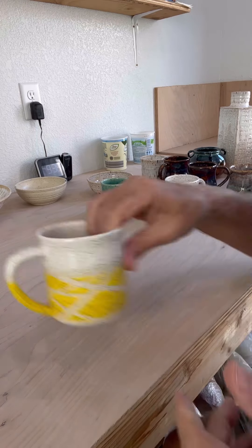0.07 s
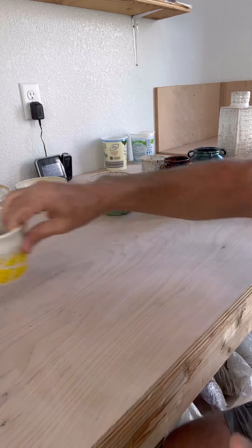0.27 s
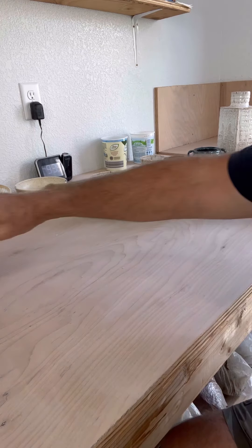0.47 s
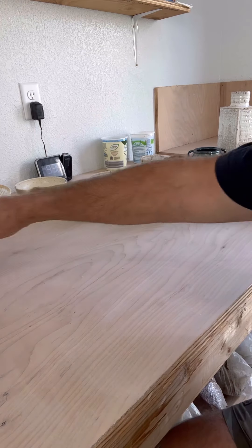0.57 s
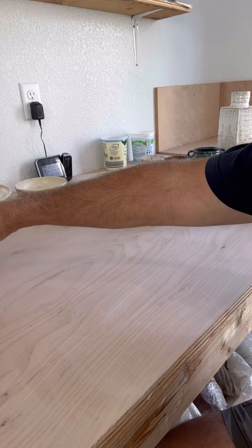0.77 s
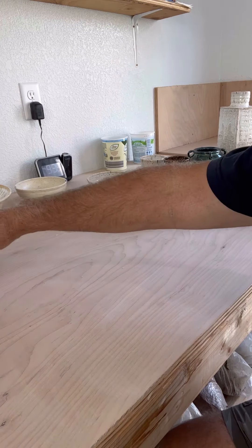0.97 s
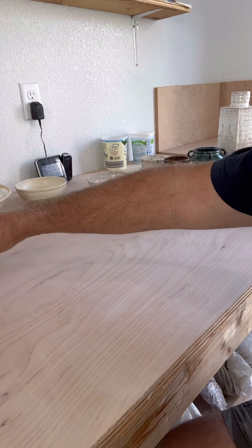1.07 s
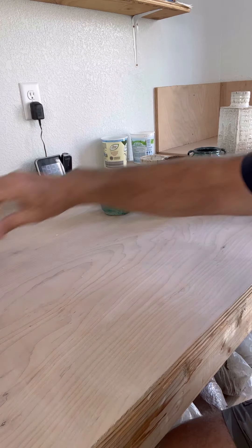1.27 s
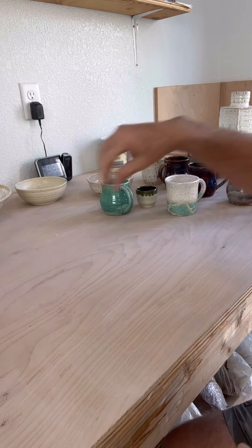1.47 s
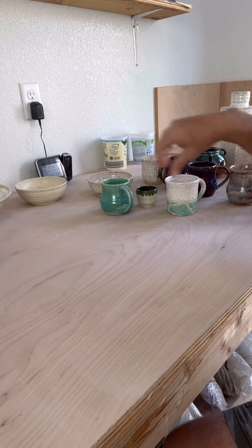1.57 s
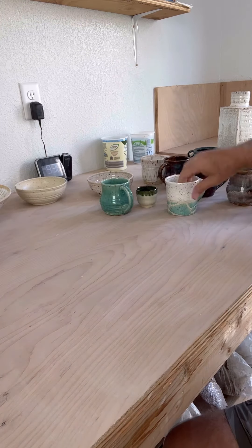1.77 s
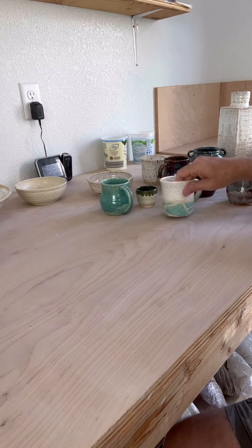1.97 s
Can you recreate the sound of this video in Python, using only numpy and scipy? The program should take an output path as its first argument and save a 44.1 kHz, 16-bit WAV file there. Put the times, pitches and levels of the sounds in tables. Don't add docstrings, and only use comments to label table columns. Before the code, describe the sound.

One solid woody clunk of a glazed mug set on a bench, with short room reverberation

```python
import sys
import numpy as np
from scipy import signal
from scipy.fft import rfft, irfft
from scipy.io import wavfile
from scipy.ndimage import uniform_filter1d

SR = 44100
rng = np.random.default_rng(int(sys.argv[2]) if len(sys.argv) > 2 else 0)


def magnitude_from_level(level_db):
    exponent = np.asarray(level_db, float) / 20
    return 10 ** exponent


def to_wav(s):
    ch = np.atleast_2d(s).T
    pcm = np.round(np.clip(ch, -1, 1) * 32767)
    wavfile.write(sys.argv[1], SR, pcm.astype(np.int16))


N = 89170

# start in seconds, level in dB, contact low-pass in Hz.
TOUCHES = [
    (0.9495, -7, 2004),
    (0.9534, -8, 1500),
    (0.9658, -11, 1200),
]


def rms_one(x):
    return x / np.sqrt(np.mean(x ** 2) + 1e-20)


def at_hz(points, hz):
    p = np.array(points)
    return np.interp(np.log(np.maximum(hz, 1)), np.log(p[:, 0]), p[:, 1])


def decay_per_sample(t60):
    return magnitude_from_level(-60 / (t60 * SR))


def coloured(spectrum, channels):
    hz = np.arange(N // 2 + 1) * SR / N
    white = rfft(rng.standard_normal((channels, N)))
    return rms_one(irfft(white * magnitude_from_level(at_hz(spectrum, hz)), N))


def diffuse(pair):
    # frequency in Hz, left-right likeness as a share.
    likeness = [(60, 0.99), (200, 0.99), (320, 0.88), (520, 0.66), (900, 0.017), (1500, 0.33),
                (2600, -0.45)]
    alike = np.clip(at_hz(likeness, np.arange(N // 2 + 1) * SR / N), -1, 1)
    mid, side = rfft(pair)
    spread = np.sqrt(1 - alike) * side * [[1], [-1]]
    return irfft(np.sqrt(1 + alike) * mid + spread, N) / np.sqrt(2)


def background():
    # frequency in Hz, level in dB per Hz.
    air_colour = [(40, -10.5), (58, -1.5), (140, -9), (250, -0.15), (420, -11), (750, -9.5), (1210, -18),
                  (2600, -26.5), (3600, -50)]
    common_colour = [(2500, -15), (3200, -2), (5000, -9.5), (7500, -15), (10500, -19), (15000, -22)]
    opposed_colour = [(2500, -26), (3200, -2.5), (5000, -18.5), (7500, -17.5), (10000, -16), (15000, -10.5)]
    air = magnitude_from_level(-52.5) * diffuse(coloured(air_colour, channels=2))
    common = magnitude_from_level(-82) * coloured(common_colour, channels=1)
    opposed = magnitude_from_level(-77.5) * coloured(opposed_colour, channels=1) * [[1], [-1]]
    return air + common + opposed


def friction(s, half, db, hz, width):
    sos = signal.butter(2, [hz - width / 2, hz + width / 2], "band", fs=SR, output="sos")
    common, opposed = rms_one(signal.sosfilt(sos, rng.standard_normal((2, N))))
    swell = np.exp(-((np.arange(N) / SR - s) / half) ** 2)
    spread = min(hz / 3000, 0.5)
    return magnitude_from_level(db) * swell * (common + spread * opposed * np.array([[1], [-1]]))


def rustles():
    # centre in seconds, half length in seconds, level in dB, frequency in Hz, width in Hz.
    rubs = [
        (.132, .014, -76, 4300, 1300),
        (.83, .05, -85, 4400, 700),
        (.33, .05, -83, 3800, 1200),
        (.29, .02, -88, 13000, 3000),
        (.49, .03, -88, 13000, 4000),
        (1.5, .1, -82, 6000, 3000),
        (1.6, .11, -75, 4000, 1600),
        (1.785, .03, -81, 14300, 2600),
        (1.86, .06, -80, 4300, 2000),
        (1.75, .15, -72, 2200, 1000),
    ]
    return sum(friction(*row) for row in rubs)


def squeaks():
    # centre in seconds, half length in seconds, level in dB, frequency in Hz.
    slips = [
        (0.285, 0.0097, -76, 4150),
        (0.282, 0.017, -78, 3470),
        (0.287, .015, -78.5, 7050),
        (.285, .015, -73.5, 10000),
        (0.339, .012, -76, 4100),
        (0.798, 0.023, -79, 4180),
        (0.833, 0.043, -82, 4640),
        (.92, .015, -83, 4580),
        (1.09, .025, -77, 6410),
    ]
    return sum(friction(*row, width=100) for row in slips)


def contacts(rows):
    force = np.zeros(N)
    for s, db, hz in rows:
        offset = np.arange(N) - s * SR
        click = magnitude_from_level(db) * np.sinc(offset) * (abs(offset) < 16)
        force += signal.sosfilt(signal.butter(2, hz, fs=SR, output="sos"), click + 1e-18)
    return force


def hard_touches():
    clicks = np.zeros(N)
    for s, db, _ in TOUCHES:
        clicks[int((s + 0.0002) * SR)] = magnitude_from_level(db)
    return clicks


def grit(clicks):
    # frequency in Hz, level in dB per Hz.
    grit_colour = [(600, -1.5), (1300, 13), (2200, -3), (3000, -17.5), (4500, -21.5), (7000, -35.5),
                   (11000, -38.5), (15500, -48)]
    fall_t60_s, rise_t60_s = 0.056, 0.002
    fade = signal.lfilter([1], [1, -decay_per_sample(fall_t60_s)], clicks + 1e-18)
    fade -= signal.lfilter([1], [1, -decay_per_sample(rise_t60_s)], clicks + 1e-18)
    common, opposed = coloured(grit_colour, channels=2)
    return magnitude_from_level(-21) * fade * (common + 0.79 * opposed * np.array([[1], [-1]]))


def ring(clicks, hz, t60):
    r, w = decay_per_sample(t60), 2 * np.pi * hz / SR
    return signal.lfilter([0, np.sin(w)], [1, -2 * r * np.cos(w), r * r], clicks + 1e-18)


def body(force, modes):
    left_db_per_octave, left_from_hz, right_lag_s = 3.5, 220, 0.00012
    travel_s_at_1k, rise_cycles = 0.0015, 1.19
    out, n = np.zeros((2, N)), np.arange(N)
    for k, (hz, db, t60) in enumerate(modes):
        octaves = np.clip(np.log2(hz / left_from_hz), 0, 3)
        left_db = left_db_per_octave * octaves / 2 * (hz < 3500)
        delay = travel_s_at_1k * SR * (np.sqrt(1000 / hz) - 1)
        late = np.interp(n - delay, n, force)
        mode = ring(late, hz, t60) - ring(late, hz, min(rise_cycles / hz, t60 / 2))
        out += (-1) ** k * magnitude_from_level(db) * mode * magnitude_from_level(np.array([[left_db], [-left_db]]))
    out[1] = np.interp(n - right_lag_s * SR, n, out[1])
    return out


def counter(force, cycles_max):
    # frequency in Hz, level in dB, t60 in seconds.
    slab_modes = [(58, -20.5, 0.17), (90, -41.5, .3), (133, -7.5, .15), (189, -15, .15),
                  (273.8, -10.5, 0.36), (365.7, -3.5, 0.071), (441.4, 0, 0.027), (584.5, 0.5, 0.027),
                  (750, -6, 0.038), (892, -6, .05), (1052, -2, 0.013), (1300, -25.5, 0.022),
                  (1495, -12.5, .03), (1720, -20.5, .04)]
    return body(force, [(hz, db, min(t60, cycles_max / hz)) for hz, db, t60 in slab_modes])


def held_mug(clicks):
    # frequency in Hz, level in dB, t60 in seconds.
    mug_modes = [(1944, -61.5, 0.033), (2130, -31.5, 0.045), (3130, -47, 0.023), (4060, -53, .025),
                 (4780, -43.5, .02), (7600, -73.5, .008)]
    damped = [(hz, db, min(t60, 0.045)) for hz, db, t60 in mug_modes]
    return body(uniform_filter1d(clicks, size=3), damped)


def room(x):
    # frequency in Hz, t60 in seconds.
    room_t60 = [(60, 1.0), (150, 0.58), (500, 0.58), (1500, 0.61), (3000, 0.67), (6000, .4), (12000, .3)]
    # frequency in Hz, level in dB.
    room_tone = [(60, -3), (100, -20), (200, 0), (500, -1), (1200, -4), (2500, 2), (6000, 0.5), (12000, 4)]
    build_s = 0.017
    t, answer = np.arange(N) / SR, 0
    edges = 40 * 2 ** np.arange(0, 9, 0.5)
    white = rng.standard_normal((2, 2, N))
    for k, (low, high) in enumerate(zip(edges, edges[1:])):
        hz = np.sqrt(low * high)
        sos = signal.butter(2, [low, high], "band", fs=SR, output="sos")
        band = signal.sosfilt(sos, white[k % 2])
        answer = answer + band * magnitude_from_level(at_hz(room_tone, hz) - 60 * t / at_hz(room_t60, hz))
    answer = diffuse(answer) * (1 - np.exp(-(t / build_s) ** 2)) * (t < 1)
    return magnitude_from_level(-33) * signal.fftconvolve(x[None], answer, axes=1)[:, :N]


def standing(force):
    # frequency in Hz, level in dB, t60 in seconds.
    room_modes = [(59.1, -21.5, 0.69), (85, -9, 0.75), (110, -1, .3), (277, -25.5, 0.98), (274, 11, 0.13),
                  (372, -22.5, .32), (418.5, -3.5, 0.57), (528, -19, 0.23), (567, -10, 0.23)]
    longest_t60_s, swell_t60_s = 0.45, 0.19
    out = np.zeros(N)
    for hz, db, t60 in room_modes:
        out += magnitude_from_level(db) * (ring(force, hz, min(t60, longest_t60_s)) - ring(force, hz, swell_t60_s))
    return magnitude_from_level(-13.5) * out


def hand_force():
    # start in seconds, level in dB, contact low-pass in Hz.
    thumps = [
        (1.668, -42.5, 252),
        (1.764, -38.5, 375),
        (1.774, -34.5, 395),
        (1.805, -77, 253),
    ]
    return contacts(thumps)


def rumbles():
    # centre in seconds, half length in seconds, level in dB, frequency in Hz, width in Hz.
    shakes = [
        (1.815, .04, -52, 62, 30),
        (1.81, .03, -54, 200, 80),
        (1.875, .03, -53, 255, 50),
        (1.68, .02, -55, 190, 60),
        (1.77, .012, -54, 270, 60),
    ]
    return sum(friction(*row) for row in shakes)


def scene():
    foot, clicks = contacts(TOUCHES), hard_touches()
    force = foot + hand_force()
    crack = grit(clicks)
    direct = counter(force, cycles_max=45) + held_mug(clicks) + crack
    far = magnitude_from_level(1.5) * counter(force, cycles_max=16.6)
    heard = (far + magnitude_from_level(6) * crack).mean(axis=0)
    quiet = rustles() + squeaks() + rumbles() + background()
    return direct + room(heard) + standing(foot) + quiet


def top_cut(x):
    return signal.sosfilt(signal.butter(12, 15800, fs=SR, output="sos"), x)


def record(dry):
    # frequency in Hz, gain in dB.
    sum_response = [(7600, 0), (8200, -25), (9700, -25), (10200, 0), (14300, 0), (15300, -14)]
    difference_response = [(10500, 0), (12000, -12), (15300, -16)]
    low_cut = signal.butter(4, 48, "high", fs=SR, output="sos")
    left, right = rfft(signal.sosfilt(low_cut, dry))
    hz = np.arange(N // 2 + 1) * SR / N
    mid = (left + right) / 2 * magnitude_from_level(at_hz(sum_response, hz))
    side = (left - right) / 2 * magnitude_from_level(at_hz(difference_response, hz))
    return top_cut(irfft(np.array([mid + side, mid - side]), N))


dry = scene()
out = record(dry)
to_wav(out)
```